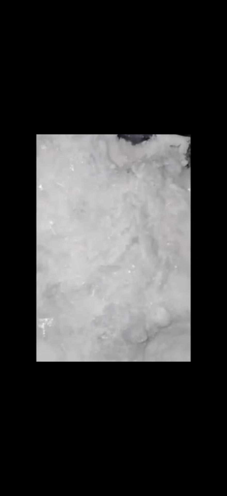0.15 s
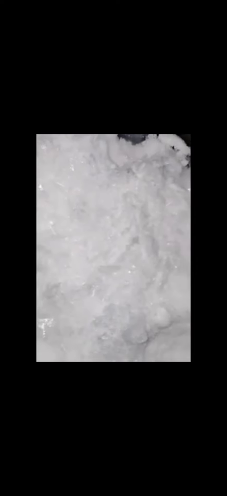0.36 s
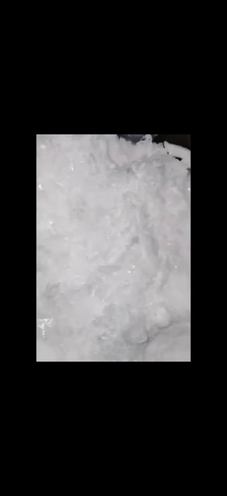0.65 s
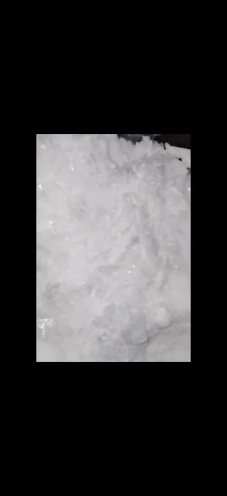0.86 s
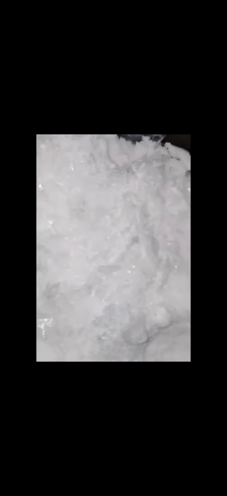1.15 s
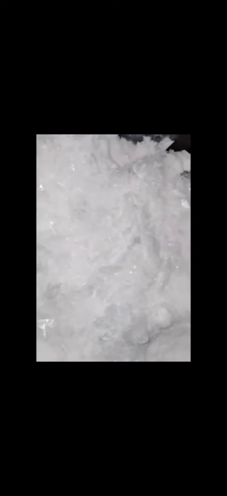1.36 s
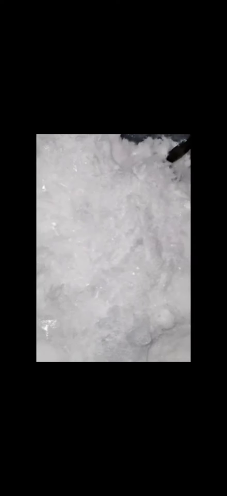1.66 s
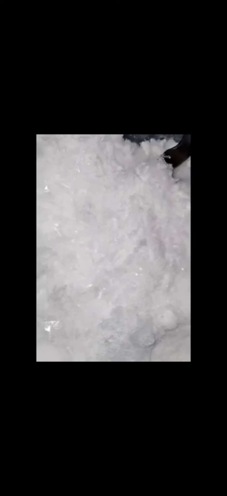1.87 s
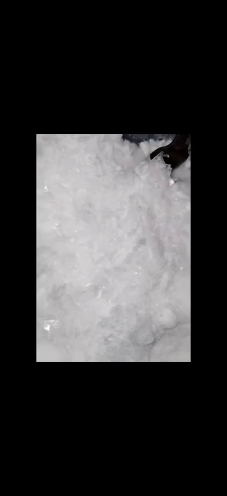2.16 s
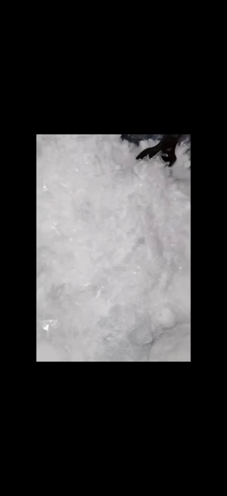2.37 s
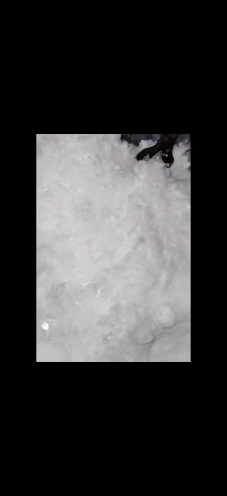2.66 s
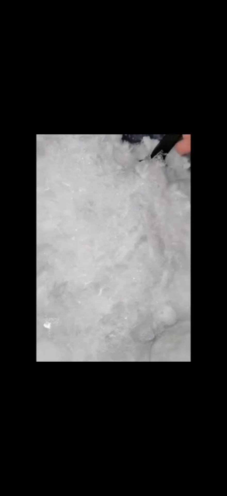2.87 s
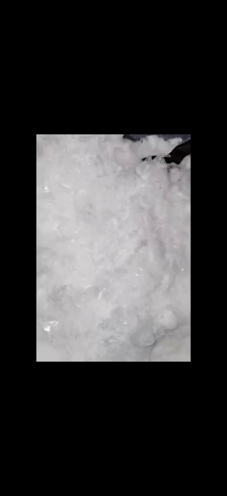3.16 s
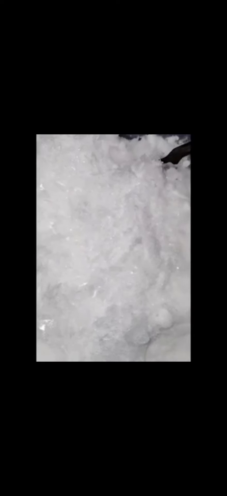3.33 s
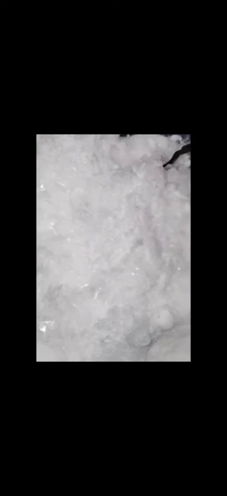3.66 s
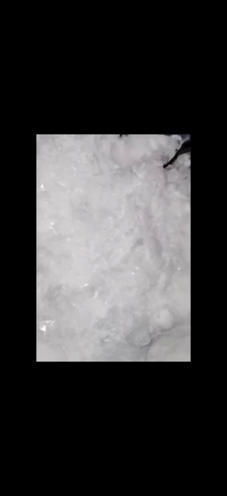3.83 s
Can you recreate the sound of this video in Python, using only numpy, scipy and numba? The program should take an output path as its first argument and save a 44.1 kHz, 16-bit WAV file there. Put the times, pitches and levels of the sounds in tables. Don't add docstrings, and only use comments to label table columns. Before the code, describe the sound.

A tool scrapes frost in a freezer drawer, heard close and dry in mono. From 0.1 s, short crumbly bites follow quickly, with fizzing crystals and bright ticks; crunches are strongest around 0.8 and 1.7-2.4 s. A sharp crack lands near 2.55 s, then sparser, lumpier knocks, hardest around 3.2-3.4 s, and light scratches to 4 s. Faint blade squeaks, dull plastic thuds and low compressor hum lie beneath.

```python
import sys
import numpy as np
from scipy import signal
from scipy.fft import rfft, irfft
from scipy.io import wavfile
from scipy.ndimage import uniform_filter1d
from numba import njit

SR = 44100
rng = np.random.default_rng(int(sys.argv[2]) if len(sys.argv) > 2 else 0)


def gain_from_db(level_db):
    decades = np.asarray(level_db, float) / 20
    return 10 ** decades


def store_pcm(level_fs):
    pcm = np.round(np.clip(level_fs, -1, 1) * 32767).astype(np.int16)
    wavfile.write(sys.argv[1], SR, np.atleast_2d(pcm).T)


N = 176400

# start t/s, length t/s, fizz level/dB, swell start to end/dB, lumps over fizz/dB
EARLY_BITES = [(0.093, 0.16, -37.5, 1.5, 8), (0.22, 0.064, -32.5, -2, -8), (0.289, 0.081, -36, -15, -26),
               (0.364, 0.069, -28, -2, -28), (0.468, 0.073, -29.5, -3, 3), (0.561, 0.06, -27, -1.5, -2),
               (0.633, 0.018, -30, 0.5, 3), (0.683, 0.017, -26, -27, -8), (0.778, 0.028, -36, 0, -22),
               (0.803, 0.025, -27.5, -0.5, -17), (0.823, 0.029, -23, -2, -5.5),
               (0.851, 0.057, -37, -0.5, 5.5), (0.983, .13, -32.5, 0, 5.5), (1.109, 0.18, -34.5, -5.5, 5),
               (1.219, 0.051, -30, 1.5, 5), (1.307, 0.012, -30.5, -17, 2), (1.365, 0.035, -25.5, -9, -2),
               (1.393, 0.12, -31.5, -4, -1), (1.56, 0.07, -25, -0.5, 1), (1.636, 0.023, -35, -1, 4),
               (1.711, 0.027, -23.5, -1, 0.5), (1.745, 0.016, -24.5, -0.5, 1),
               (1.848, 0.021, -21.5, -12, -2), (1.912, 0.019, -22.5, -18, 1)]
# start t/s, length t/s, fizz level/dB, swell start to end/dB, lumps over fizz/dB
LATE_BITES = [(1.954, 0.037, -24.5, -3.5, 2), (2.002, 0.012, -31, 0, 4.5), (2.023, 0.011, -32, -8, 6),
              (2.05, 0.11, -27.5, -6.5, 3), (2.19, 0.048, -26, -0.5, 2), (2.298, 0.044, -27, -7.5, 2.5),
              (2.35, 0.0069, -23.5, -16, 1.5), (2.55, 0.14, -27.5, -6.5, 4), (2.825, 0.042, -38.5, 2.5, 7),
              (2.928, 0.084, -30.5, 2, 7.5), (3.169, 0.13, -32.5, 2.5, 10), (3.317, 0.031, -35, 1, 14),
              (3.351, 0.018, -35, 1, 12.5), (3.387, 0.03, -36.5, -1, 15.5), (3.42, 0.075, -29, 1, 12),
              (3.5, 0.034, -35, -6, 10), (3.739, 0.019, -30, 0.5, -22), (3.84, 0.014, -33, 1, -19),
              (3.88, 0.007, -30, -2, 0), (3.965, 0.051, -36.5, 3.5, 6)]
# t/s, fizz level/dB, lumps over fizz/dB, darkness of the ring/(dB per octave)
LIGHT_DRAG = [(0, -56.5, 4, 2), (.43, -35, 6, -2), (.74, -55, 6, -3.5), (.93, -49.5, 10, 8.5),
              (1.34, -54.5, 16, 2), (1.54, -39, -3.5, -1), (1.8, -61, 18.5, -1), (2.1, -33, 5, -2.5),
              (2.27, -39, 6.5, -4.5), (2.5, -71.5, 18.5, -3), (2.7, -45.5, 6.5, -2), (2.78, -48, 11, -4.5),
              (3.05, -36, 2.5, 1.5), (3.3, -46.5, 6, 1.5), (3.6, -73.5, 19, 2.5), (3.75, -40, 1.5, 0),
              (3.9, -37, -3.5, 4), (4, -40, 8, 8)]
# t/s, main ring f/Hz, main ring level/dB, upper ring level/dB, fizz sheen/(dB per octave)
BLADE_GRIP = [(0, 2190, -1.5, -11, 1.5), (.5, 2260, 1, 0.5, 2), (.8, 2170, -0.5, -1.5, 2),
              (1.1, 2070, -0.5, 3, 0), (1.4, 2220, -0.5, 2, 0.5), (1.65, 2230, 1, -0.5, 2.5),
              (2.1, 2200, 1.5, 1.5, 0.5), (2.56, 2470, 0.5, 1, 0), (2.67, 2070, 2, -6, -9.5),
              (2.85, 2350, 3, -4, -4.5), (3, 2340, 2, -4, 0.5), (3.25, 2260, 2, -7, 2.5),
              (3.34, 2440, 5.5, -3.5, -4), (3.5, 2030, 2, -6, -4), (4, 2070, -5, 2, 0.5)]
# t/s, ring f/Hz, level/dB
DUG_HOLLOW = [(0, 1320, -1), (.24, 1310, 3), (.29, 1310, -16), (.45, 1290, -2), (.8, 1390, -1),
              (.83, 1750, 1), (.9, 1420, 2.5), (1.0, 1650, -0.5), (1.2, 1110, 1.5), (1.28, 1060, 2),
              (1.37, 1260, 0), (2.4, 1290, -0.5), (2.7, 1300, -5.5), (3.3, 1360, -0.5), (3.5, 1250, -1),
              (3.9, 1200, -3), (4, 1080, -0.5)]
# f/Hz, width/Hz, level/dB
FROST_RING = [
    (1290, 346, -3),
    (2130, 544, -2),
    (2920, 400, -3.5),
    (4800, 750, -9.5),
    (715, 400, -13),
]
# f/Hz, level per Hz/dB
FIZZ_COLOUR = [(400, -8.5), (1000, -8), (3500, -2), (6800, -5), (8000, -8), (9200, -6.5), (11500, -0.5),
               (15300, -2)]
# t/s, peak level/dB, ring f/Hz
LUMP_CRACKS = [(0.4708, -6, 2870), (0.565, -13, 2110), (0.6823, -10.5, 2140), (1.3068, -14.5, 2900),
               (1.3687, -7, 3020), (1.8527, -8, 2800), (1.9143, -12, 2050), (1.9621, -10, 3000),
               (2.2989, -8, 2600), (2.3507, -15, 1220), (2.5536, -7.5, 5440), (2.9305, -12, 2980),
               (2.9547, -6, 2200), (3.1896, -4.5, 2330), (3.1917, -8, 1370), (3.336, -12, 2400),
               (3.3623, -9.5, 3600), (3.3946, -1.5, 1880), (3.4247, -10, 2210), (3.7495, -8, 5440),
               (3.7527, -7.5, 3550), (3.8843, -8.5, 3100), (3.9764, -10.5, 6770)]
# t/s, peak level/dB
CRYSTAL_TICKS = [(0.1077, -27), (0.3007, -22), (0.3774, -20), (0.5636, -12), (0.7437, -31), (0.7826, -23),
                 (0.7921, -18), (0.8041, -14.5), (0.8164, -16), (0.8244, -17), (0.833, -9.5), (0.8364, -13),
                 (0.8424, -20), (1.0036, -16), (1.0234, -11), (1.0634, -21), (1.5399, -16.5), (1.5974, -10),
                 (1.7224, -19), (2.1745, -18), (2.3074, -10), (2.5545, -5.5), (2.7596, -35), (2.801, -37),
                 (2.819, -27), (2.8858, -20.5), (3.1068, -17), (3.4454, -15), (3.4524, -20), (3.8467, -20),
                 (3.9434, -16)]
# start t/s, length t/s, level/dB, first f/Hz, last f/Hz
BLADE_SQUEAKS = [
    (0.092, 0.036, -35.5, 2160, 2180),
    (0.366, 0.021, -34, 3150, 3180),
    (1.111, 0.032, -37.5, 1350, 1250),
    (1.378, .05, -39.5, 2970, 2980),
    (2.59, 0.059, -32, 2550, 1900),
    (3.503, 0.051, -35, 1920, 2010),
    (3.797, 0.014, -41, 1260, 1200),
    (3.876, 0.018, -34.5, 1280, 1210),
    (3.885, 0.12, -42, 3200, 3300),
    (3.968, 0.056, -33.5, 990, 1130),
]
# start t/s, length t/s, level/dB
DRAWER_PUSHES = [(0.456, 0.037, -32), (0.48, 0.086, -35), (1.949, 0.11, -42.5), (2.049, 0.091, -40),
                 (2.203, 0.031, -41), (2.294, 0.029, -39.5), (2.548, 0.0071, -30), (2.571, 0.092, -42),
                 (2.917, 0.24, -44.5), (3.183, .33, -47.5), (1.199, 0.22, -49)]
# f/Hz, width/Hz, level/dB
DRAWER_WALLS = [
    (115, 43, -2.5),
    (244, 67, 3),
    (319.5, 87, -4.5),
]
# f/Hz, level per Hz/dB
ROOM_COLOUR = [(32, -45), (46, -9), (75, -12.5), (250, -9), (500, -15.5), (900, -22), (3000, -32),
               (8000, -53)]
# f/Hz, width/Hz, level/dB
COMPRESSOR_HUM = [
    (49.2, 12, -50),
    (145.9, 1.46, -52.5),
]
# t/s, level/dB
COMPRESSOR_SWELL = [
    (0, 4.5),
    (.7, 0.5),
    (1.4, 2.5),
    (1.7, 1),
    (2.6, -1),
    (3.3, -1.5),
    (4, 2.5),
]

TAIL_S = 0.037


def unit(x):
    return x / np.sqrt(np.mean(x ** 2))


@njit
def svf(x, hz, width):
    y, band, low = np.empty(len(x)), 0., 0.
    for i in range(len(x)):
        g, k = np.tan(np.pi * hz[i] / SR), width / hz[i]
        v = (band + g * (x[i] - low)) / (1 + g * (g + k))
        band, low = 2 * v - band, low + 2 * g * v
        y[i] = k * v
    return y


def resonance(x, hz, width):
    return svf(x, np.full(len(x), float(hz)), float(width))


def colour(x, points):
    hz, db = np.array(points).T
    size = 8192
    f = np.maximum(np.arange(size // 2 + 1) * SR / size, 1)
    cepstrum = irfft(np.interp(np.log(f), np.log(hz), db) * np.log(10) / 20)
    cepstrum[1:size // 2] *= 2
    cepstrum[size // 2 + 1:] = 0
    impulse = irfft(np.exp(rfft(cepstrum)))
    return signal.fftconvolve(x, impulse)[:N]


def walk(rate):
    k = int(SR / rate)
    steps = np.repeat(rng.standard_normal(1000), k)[:N]
    w = uniform_filter1d(uniform_filter1d(steps, k), k)
    return w / w.std()


def curves(table):
    t, *columns = np.array(table).T
    return [np.interp(np.arange(N) / SR, t, c) for c in columns]


def span(start, length):
    at = np.arange(int(start * SR) + 1, min(int((start + length) * SR), N))
    return at, at / SR - start


def snaps(per_s, spread_db):
    happens, sign, luck = rng.random((3, N))
    size = np.minimum(-np.log(1 - luck), 3.5)
    return unit((happens < per_s / SR) * np.sign(sign - .5) * gain_from_db(spread_db * size))


def burst(start, length, db, swell_db=0.):
    attack_s, fade_in_s_per_db, release_s = 0.0033, 0.01, 0.0078
    round_db, tail_db = 4, -13
    at, t = span(start, length + 10 * TAIL_S)
    u = np.clip(t / length, 0, 1) - .5
    rise = np.clip(t / (attack_s + fade_in_s_per_db * max(swell_db, 0)), 0, 1)
    hold = rise * gain_from_db(db + swell_db * u - round_db * (2 * u) ** 2)
    past = np.maximum(t - length, 0)
    release = np.exp(-2 * past / release_s)
    tail = gain_from_db(tail_db) ** 2 * np.exp(-2 * past / TAIL_S)
    power = np.zeros(N)
    power[at] = hold ** 2 * (release + tail)
    return power


def frost():
    base_db, lump_db, dark_db = curves(LIGHT_DRAG)
    fizz_power, lump_power = gain_from_db(base_db) ** 2, gain_from_db(base_db + lump_db) ** 2
    for start, length, db, swell_db, over_db in EARLY_BITES + LATE_BITES:
        bite = burst(start, length, db, swell_db)
        fizz_power = fizz_power + bite
        lump_power = lump_power + bite * gain_from_db(over_db) ** 2
    lump_smear_s = 0.0095
    lump_power = uniform_filter1d(lump_power, int(lump_smear_s * SR) + 1)
    grit = walk(150)
    return fizz(fizz_power, grit) + gain_from_db(-11.5) * lumps(lump_power, grit, dark_db)


def fizz(power, grit):
    sheen_db = curves(BLADE_GRIP)[3]
    crystals = unit(colour(snaps(9000, 4), FIZZ_COLOUR))
    patchy = 0
    for hz in (1400., 2800., 5500., 9500., 13500.):
        flicker = gain_from_db(2.9 * walk(45.04) + sheen_db * np.log2(hz / 6600.0))
        patchy = patchy + flicker * resonance(crystals, hz, hz)
    return unit(patchy) * np.sqrt(power) * gain_from_db(1.25 * grit)


def lumps(power, grit, dark_db):
    hollow_hz, hollow_db = curves(DUG_HOLLOW)
    main_hz, main_db, upper_db, _ = curves(BLADE_GRIP)
    low_db = np.minimum(np.arange(N) / SR, 3) * 2 - 5 - dark_db
    knocks = snaps(2500, 1) * np.sqrt(power) * gain_from_db(1.7 * grit + 0.84 * walk(60))
    pitches = (hollow_hz, main_hz, None, None, None)
    levels = (hollow_db, main_db, upper_db, 0, low_db)
    ring = 0
    for (hz, width, db), moving_hz, moving_db in zip(FROST_RING, pitches, levels):
        pitch = hz if moving_hz is None else moving_hz
        centre = pitch * (1 + 0.052 * walk(40))
        tilt_db = -dark_db * np.log2(hz / 1750.0)
        gain = gain_from_db(db + moving_db + 1.56 * walk(40) + tilt_db) * np.sqrt(SR / width)
        once = svf(knocks, centre, 1.28 * width)
        ring = ring + gain * svf(once, centre, 1.28 * width)
    return ring


def cracks():
    rise_s, crack_s, tick_s = 0.0013, 0.0018, 0.00091
    width_hz = 156
    spit, ring, noise = np.zeros(N), np.zeros(N), snaps(15000, 2.7)
    for start, db, hz in LUMP_CRACKS:
        at, age = span(start, 20 * crack_s)
        hit = noise[at] * gain_from_db(db - 6) * np.minimum(age / rise_s, 1) * np.exp(-age / crack_s)
        spit[at] += gain_from_db(-5) * hit
        ring[at] += resonance(hit, hz, width_hz)
    for start, db in CRYSTAL_TICKS:
        at, age = span(start, 10 * tick_s)
        spit[at] += noise[at] * gain_from_db(db - 1.5) * np.exp(-age / tick_s)
    return colour(spit, FIZZ_COLOUR) + gain_from_db(-5.5) * np.sqrt(SR / width_hz / 2) * ring


def squeaks():
    width_hz = 140.
    chatter, out = snaps(3000, 1.2), np.zeros(N)
    for start, length, db, first_hz, last_hz in BLADE_SQUEAKS:
        at, age = span(start, length + 2 * TAIL_S)
        centre = np.interp(age, [0, length], [first_hz, last_hz])
        tone = svf(svf(chatter[at], centre, width_hz), centre, 2.2 * width_hz)
        out[at] += np.sqrt(burst(start, length, db)[at]) * unit(tone)
    return out


def drawer():
    push = sum(burst(*row) for row in DRAWER_PUSHES)
    jolts = snaps(500, 1.05) * np.sqrt(push) + 1e-18
    walls = 0
    for hz, width, db in DRAWER_WALLS:
        thud = resonance(resonance(jolts, hz, width), hz, 2.9 * width)
        walls = walls + gain_from_db(db) * np.sqrt(SR / width / 2) * thud
    return walls


def room():
    air = unit(colour(rng.standard_normal(N), ROOM_COLOUR)) * gain_from_db(-46 + walk(4.2))
    for hz, width, db in COMPRESSOR_HUM:
        tone = resonance(resonance(rng.standard_normal(N), hz, width), hz, 3 * width)
        air = air + gain_from_db(db + walk(3.5)) * unit(tone)
    return air * gain_from_db(curves(COMPRESSOR_SWELL)[0])


def scene():
    return (frost() + cracks() + squeaks() + drawer() + room())[None]


def roll_off(x):
    return signal.sosfilt(signal.butter(12, 16470, fs=SR, output="sos"), x)


def record(dry):
    dipped = dry - 0.72 * resonance(dry[0], 7860, 820)
    top_cut = signal.cheby2(12, 38, 16000, fs=SR, output="sos")
    return roll_off(signal.sosfilt(top_cut, dipped))


dry = scene()
out = record(dry)
store_pcm(out)
```